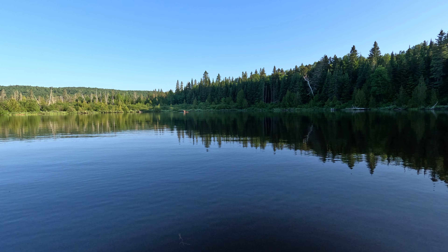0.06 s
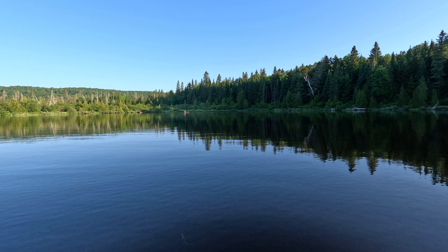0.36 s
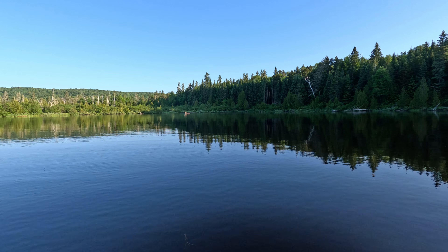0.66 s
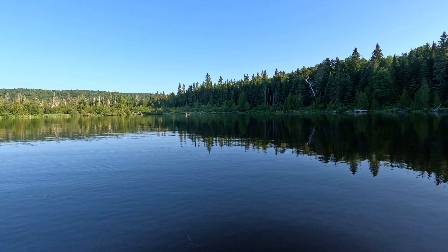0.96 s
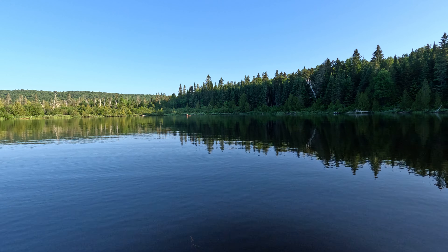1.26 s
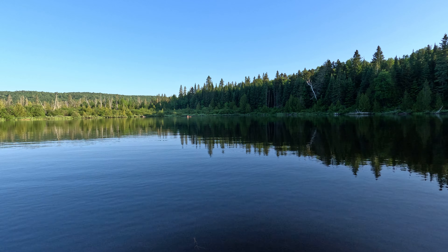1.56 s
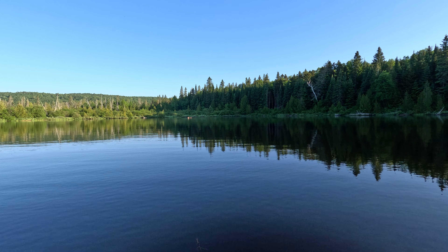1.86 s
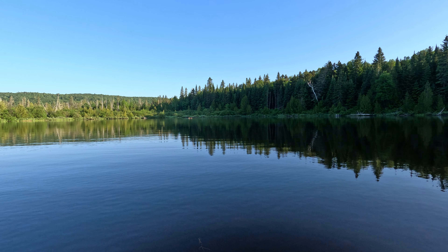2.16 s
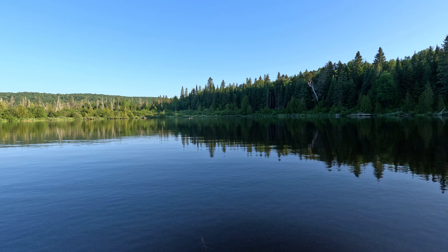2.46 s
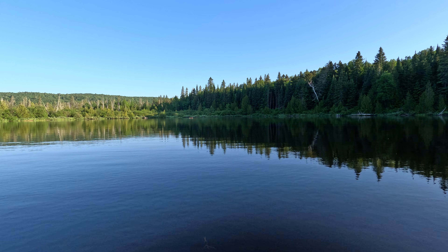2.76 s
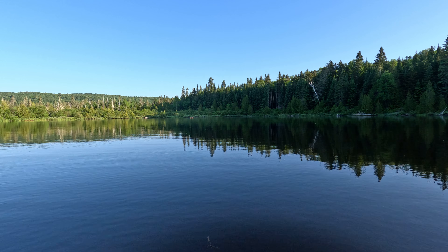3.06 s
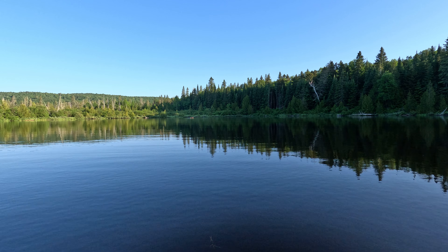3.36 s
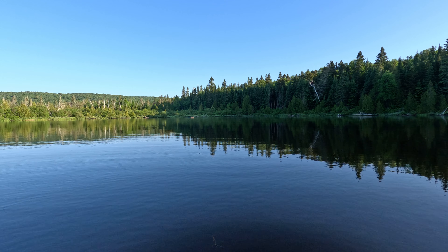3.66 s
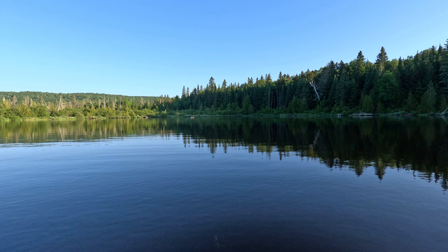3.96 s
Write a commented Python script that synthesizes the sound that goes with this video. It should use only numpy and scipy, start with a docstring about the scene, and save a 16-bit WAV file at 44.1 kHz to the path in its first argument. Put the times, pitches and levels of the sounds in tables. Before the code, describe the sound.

Distant rasping caws repeat and echo in the trees by a quiet lake, over small chirping birds and soft puffs of air on the microphone. Two small water drips come midway, then four short, closer animal clucks.

```python
"""Four seconds at a calm forest lake. From the start, small songbirds whistle and light puffs of air
rumble on the microphone over a faint hush. Soon crow-like birds far off on the left begin their
rasping caws: quick pulses that ring in the throat and echo in the trees. After a second comes a tiny
tick, then water drips twice, each drip a small ringing bubble. Near the end a closer animal clucks
four times, and the shore answers."""
import sys
import numpy as np
from scipy import signal
from scipy.fft import rfft, irfft, next_fast_len
from scipy.io import wavfile
from scipy.ndimage import map_coordinates

SR = 44100
rng = np.random.default_rng(int(sys.argv[2]) if len(sys.argv) > 2 else 0)


def to_wav(s):
    """Save 16-bit WAV."""
    ch = np.atleast_2d(s).T  # columns
    pcm = np.round(np.clip(ch, -1, 1) * 32767)  # PCM
    wavfile.write(sys.argv[1], SR, pcm.astype(np.int16))


N = 176400

# The caws. Each row: start and length in seconds, pitch in Hz, share by which the pitch falls, relative
# level in dB, its change over the call in dB, upper throat resonance in Hz, its relative level in dB,
# roughness from 0 to 1.
CAW_CALLS = [(.38, 0.53, 1235, .085, -61.5, -4, 1600, -15.5, 0.26),
             (0.738, .28, 1487, 0.1, -65.5, 6.5, 1790, -19.5, 0.43),
             (1.197, 0.25, 1289, 0.13, -50, -13, 1713, -11, 0.16),
             (1.391, 0.17, 1373, 0.034, -59.5, -5, 1540, 0, 0.5),
             (1.819, .23, 1296, 0.067, -54, -8.5, 1690, -21, 0.06),
             (1.968, 0.26, 1383, 0.048, -64.5, -2.5, 1633, -11, 0.89),
             (2.209, .19, 1375, 0.0069, -63.5, -6, 1730, -16, 0.9),
             (2.634, .42, 1391, .13, -62, -5.5, 1715, -6, .6),
             (3.376, 0.13, 1277, 0.0091, -60.5, -3.5, 1505, -15.5, 0.65),
             (3.52, 0.29, 1324, .04, -66, -14, 1550, -28, 0.53),
             (3.951, .38, 1110, .021, -59.5, -15, 1450, -6, 0.4)]
# The clucks. Each row: start and length in seconds, top pitch in Hz, relative level in dB.
CLUCK_CALLS = [(2.9392, 0.019, 737.5, -42), (3.1964, .0172, 729, -43), (3.495, .0188, 753, -43.5),
               (3.8522, 0.017, 792, -44)]
# Buzzy notes of the loudest songbird. Each row: start and length in seconds, first, middle and last
# pitch in Hz, relative level in dB, left over right in dB, size of the warble in Hz.
BUZZY_NOTES = [(0, 0.037, 2770, 2727, 2290, -68.5, 11, 170), (0.01, 0.048, 3420, 4700, 4030, -74, 2, 231),
               (0.053, 0.13, 4370, 3987, 3500, -71.5, 7, 353),
               (0.13, 0.12, 3715, 3770, 3790, -73, 10, 59.6), (1.163, 0.12, 5110, 4490, 4570, -79, 3, 253),
               (1.241, 0.1, 2750, 3162, 3907, -65, 0.5, 195),
               (1.266, 0.12, 4230, 4220, 3610, -76.5, 2, 345),
               (1.404, 0.11, 2750, 3894, 4730, -68.5, -0.5, 202),
               (1.49, 0.15, 4370, 4830, 4120, -76.5, 1.5, 379),
               (1.524, 0.053, 3980, 2984, 2755, -66, 0.5, 206),
               (1.674, 0.065, 5470, 4540, 3530, -77.5, 2, 400),
               (1.957, 0.083, 3685, 4750, 3740, -77, 3.5, 247.5),
               (2.106, 0.053, 2950, 3490, 3790, -71, 4, 297),
               (2.351, 0.11, 3950, 2728, 4020, -73.5, 14, 30.4),
               (2.357, 0.084, 5160, 4720, 4270, -79.5, 3, 295),
               (2.495, 0.05, 2915, 3690, 4020, -71.5, 3.5, 240), (2.61, .07, 2920, 3442, 3790, -71, 4, 201),
               (2.743, 0.086, 3270, 4360, 5120, -80, 5, 382)]
# Quick slides of smaller birds, and thin high whistles. Each row: start and length in seconds,
# first, middle and last pitch in Hz, relative level in dB.
SLIDING_NOTES = [(0.371, 0.068, 5600, 4580, 2940, -79.5), (0.558, 0.089, 5000, 3740, 2660, -79.5),
                 (0.76, 0.043, 4970, 3540, 2580, -76), (0.895, 0.026, 4180, 4770, 6000, -78.5),
                 (0.944, 0.032, 4920, 3620, 2840, -77.5), (1.081, 0.033, 5050, 3630, 2540, -77),
                 (1.125, 0.021, 3000, 3440, 3480, -75), (1.73, 0.013, 2500, 3716, 4190, -67.5),
                 (1.829, 0.034, 4100, 3730, 3670, -75), (2.076, 0.033, 5770, 4490, 3600, -77.5),
                 (2.225, 0.014, 3820, 3920, 3570, -73), (2.477, 0.033, 5400, 4310, 3500, -75.5),
                 (2.876, 0.039, 2750, 3080, 3300, -78), (2.892, 0.028, 6740, 5760, 3910, -77),
                 (2.988, 0.042, 4580, 4167, 3700, -77.5), (3.127, 0.041, 3010, 3290, 3230, -83.5),
                 (3.413, 0.047, 2840, 3130, 3520, -86),]
THIN_NOTES = [(0.214, 0.29, 7270, 7020, 7620, -93), (0.58, 0.19, 7660, 7730, 7870, -95),
              (3.041, 0.47, 8000, 7320, 6640, -91.5)]
# The drips. Each row: start and swelling time in seconds, first and last pitch in Hz, level in dB,
# left over right in dB.
DRIP_BUBBLES = [(1.736, 0.021, 1500, 2335, -50, -4), (2.657, 0.0052, 820, 1110, -50.5, 0)]
# Puffs of air. Each row: middle and rough length in seconds, relative levels of the push and of the
# flutter in dB, left over right in dB.
AIR_PUFFS = [(0.078, 0.09, -33, -68, -6), (0.191, 0.074, -38.5, -71, -6), (0.313, 0.083, -42, -73.5, -6.5),
             (0.526, 0.057, -38.5, -61.5, -9), (0.59, 0.074, -36.5, -72, -5), (0.744, 0.032, -47, -60, 8.5),
             (.886, 0.051, -37, -61.5, -6.5), (1.13, 0.069, -44, -89, -5), (1.372, 0.031, -49.5, -63.5, -6),
             (1.466, 0.061, -42, -70, -4.5), (2.13, 0.056, -42.5, -59.5, -5.5),
             (2.191, 0.065, -43, -81, -5), (2.874, .072, -34.5, -55, 11), (2.929, 0.087, -39.5, -55, -0.5),
             (3.097, 0.086, -33.5, -55, -2.5), (3.285, 0.065, -43, -59.5, 3),
             (3.608, 0.066, -36, -56.5, -4.5), (3.673, 0.06, -44, -65.5, -3)]

# Tone curves, which make some frequencies louder than others. Each row: frequency in Hz, gain in dB.
CAW_TONE = [(700, -46), (950, -12), (1100, -2), (1300, -6), (1750, -3.5), (1950, -7.5), (2300, -9.5),
            (3000, -40)]
CLUCK_THROAT_TONE = [(500, -9), (750, -12.5), (1000, -10.5), (1220, -3), (1470, 1), (1800, -13.5),
                     (2200, -21), (2900, -38)]
CLUCK_ECHO_TONE = [(450, -3.5), (700, -8.5), (1300, -5), (2300, -4)]
TICK_TONE = [(3000, -49), (4800, 13), (5800, 8), (7500, -9), (11000, -15), (14000, -40)]
RUMBLE_TONE = [(10, 8.5), (25, -0.5), (36, 4), (50, -20), (70, -22), (110, -41.5), (250, -81.5),
               (600, -120)]
FLUTTER_TONE = [(30, -26.5), (60, 5), (110, -7), (160, -14), (220, -20.5), (400, -37), (900, -70),
                (2000, -120)]
HUSH_TONE = [(85, -31), (135, 3.5), (190, 2.5), (290, -3.5), (400, -6.5), (600, -5), (850, -12), (1280, -5),
             (1600, -14.5), (2200, -14), (3300, -19), (5000, -23.5), (6300, -25), (7500, -27), (8700, -35),
             (10500, -39.5), (11900, -34.5), (13000, -40)]
# How long the trees and the shore echo. Each row: frequency in Hz, seconds to fade by 60 dB.
FOREST_FADE = [(300, 0.26), (1400, 2.58), (4000, 1.29), (9000, 0.47)]
SHORE_FADE = [(300, 0.15), (1400, 0.11), (4000, 0.055), (9000, 0.066)]


def caw(length, hz, fall, fade_db, upper_hz, upper_db, roughness):
    """One caw: quick pulses ring through two throat resonances; the pitch scoops up, then sags."""
    main_harmonic = 19  # the pulses come this many times slower than the pitch
    rise_s, release_s = .08, .06
    lower_half_width_hz, upper_half_width_hz = 78, 129
    t = np.arange(int((length + release_s / 2) * SR)) / SR
    scoop = .07 * np.clip(1 - t / rise_s, 0, 1) ** 2
    sag = fall * np.clip((t - rise_s) / (length - rise_s), 0, None) ** 1.4
    pitch = hz * (1 - scoop - sag + 0.0028 * wobble(18, len(t)))
    pulse_phase = 2 * np.pi * np.cumsum(pitch) / SR / main_harmonic
    opening = amp(upper_db + 10.5 * (t / length - .5))  # the upper resonance grows during the call
    voice = 0
    for k in range(14, 32):
        harmonic_hz = hz * k / main_harmonic
        lower = 1 / (1 + ((harmonic_hz - hz) / lower_half_width_hz) ** 2)
        upper = opening / (1 + ((harmonic_hz - upper_hz) / upper_half_width_hz) ** 2)
        steady = np.exp(2.5j * rng.standard_normal())  # each harmonic starts at a random phase
        rasp = roughness * (wobble(70, len(t)) + 1j * wobble(70, len(t)))
        harmonic = np.real((steady + rasp) * np.exp(1j * k * pulse_phase))
        waver = amp(2 * wobble(18, len(t)))
        voice = voice + (lower + upper + amp(-29)) * waver * harmonic
    return unit(voice) * amp(fade_db * t / length) * gate(t, t[-1], attack=.09, release=release_s)


def crows(right_lag_s=0.00035):
    """Caws come from the left, so they reach the right microphone later; the woods blur them."""
    calls = np.zeros(N)
    for start, length, hz, fall, db, fade_db, upper_hz, upper_db, roughness in CAW_CALLS:
        add(calls, start, amp(db) * caw(length, hz, fall, fade_db, upper_hz, upper_db, roughness))
    calls = coloured(calls, CAW_TONE)
    shore = amp(-3.5) * echoes(calls, SHORE_FADE, side_db=-16)
    early = panned(amp(5.5) * calls + shore, pan_db=14.5)
    forest = amp(-6.5) * panned(echoes(calls, FOREST_FADE, side_db=0), pan_db=3)
    return delayed(early, np.array([[0], [right_lag_s]])) + forest


def clucks(rise_s=0.0051, tail_s=0.022):
    """Very short notes flick up and fall back through a throat resonance, and the shore answers."""
    calls = np.zeros(N)
    for start, length, top_hz, db in CLUCK_CALLS:
        t = np.arange(int((length + tail_s) * SR)) / SR
        arc = np.interp(t, [0, rise_s, length, t[-1]], [0.73, 1, 0.77, 0.59])
        pitch = top_hz * arc * (1 + .018 * wobble(600, len(t)))
        phase = 2 * np.pi * np.cumsum(pitch) / SR
        harmonics = [amp(along(CLUCK_THROAT_TONE, k * pitch)) * np.sin(k * phase) for k in range(1, 5)]
        lowest = harmonics[0] * gate(t, t[-1], rise_s, release=t[-1])  # outlasts the overtones
        overtones = sum(harmonics[1:]) * gate(t, length, rise_s, release=0.0018)
        add(calls, start, amp(db) * (lowest + overtones))
    shore = echoes(coloured(calls, CLUCK_ECHO_TONE), SHORE_FADE, side_db=-11)
    forest = amp(-18.5) * echoes(calls, FOREST_FADE, side_db=-5)
    return panned(calls + amp(-5.5) * delayed(shore, seconds=.009), pan_db=7) + forest


def whistle(length, first, middle, last, buzz_hz, shimmer_db=2.5):
    """One bird note follows an arc of pitch, with a quick random warble."""
    t = np.arange(int(length * SR)) / SR
    arc = np.polyval(np.polyfit([0, .5, 1], [first, middle, last], 2), t / length)
    pitch = arc + buzz_hz * wobble(700, len(t))
    tone = np.sin(2 * np.pi * np.cumsum(pitch) / SR)
    shimmer = amp(shimmer_db * wobble(110, len(t)))
    return unit(tone * shimmer) * gate(t, length, length / 4, length / 4)


def songbirds():
    """Buzzy notes and quick slides echo off the shore and trees; thin whistles sound above them."""
    song, thin = np.zeros((2, N)), np.zeros(N)
    for start, length, *pitches, db, pan_db, buzz_hz in BUZZY_NOTES:
        add(song, start, panned(amp(db) * whistle(length, *pitches, buzz_hz), pan_db))
    for start, length, *pitches, db in SLIDING_NOTES:
        add(song, start, panned(amp(db) * whistle(length, *pitches, buzz_hz=101), pan_db=5.5))
    for start, length, *pitches, db in THIN_NOTES:
        add(thin, start, amp(db) * whistle(length, *pitches, buzz_hz=80, shimmer_db=5))
    shore = amp(-2.5) * echoes(song, SHORE_FADE, side_db=-5.5)
    forest = amp(-5.5) * echoes(song, FOREST_FADE, side_db=-5.5)
    return amp(-4) * song + shore + forest + panned(thin, pan_db=5)


def drips(damping=2.6):
    """Small bubbles ring louder as their pitch rises, then die away at once."""
    bubbles = np.zeros((2, N))
    for start, rise_s, first_hz, last_hz, db, pan_db in DRIP_BUBBLES:
        age = np.arange(int(4 * rise_s * SR)) / SR / rise_s  # 1 at the loudest moment
        pitch = last_hz + (first_hz - last_hz) * np.clip(1 - age, 0, 1) ** 2
        tone = np.sin(2 * np.pi * np.cumsum(pitch) / SR)
        swell = np.minimum(age, 1) ** 1.05 * np.exp(-damping * np.maximum(age - 1, 0))
        add(bubbles, start, panned(amp(db) * tone * swell, pan_db))
    return bubbles + amp(-17) * echoes(bubbles, SHORE_FADE, side_db=-5)


def tick(start_s=1.039, decay_s=.0016):
    """One tiny, dry tick close by: a burst of bright noise."""
    t = np.arange(N) / SR - start_s
    return amp(-63.5) * noise(TICK_TONE, side_db=-12) * (t > 0) * np.exp(-np.abs(t) / decay_s)


def air_puffs():
    """Each puff pushes and pulls on the microphone and flutters; an uneven rumble goes on beneath."""
    t = np.arange(N) / SR
    pushes, flutter_level = np.zeros(N), amp(-89)
    for middle, length, push_db, flutter_db, pan_db in AIR_PUFFS:
        age = (t - middle) / length
        offset = rng.random() + 0.11 * rng.random((2, 1))  # left and right are a little out of step
        push = np.sin(2 * np.pi * (1.72 * age + offset)) * np.exp(-(2 * age) ** 2)
        pushes = pushes + panned(amp(push_db) * push, pan_db)
        flutter_level = flutter_level + panned(amp(flutter_db) * np.exp(-(1.17 * age) ** 2), pan_db)
    rumble = amp(-53 + 3 * wobble(6.87)) * noise(RUMBLE_TONE, side_db=-4.5)
    return pushes + panned(rumble, pan_db=-3) + flutter_level * noise(FLUTTER_TONE, side_db=-4)


def forest_hush():
    """A faint, wide noise whose level drifts slowly."""
    return panned(amp(-73.5 + 0.96 * wobble(1.2)) * noise(HUSH_TONE, side_db=-3.5), pan_db=-1)


def echoes(x, fade_times, side_db):
    """The surroundings answer with a wash of echoes; each frequency fades at its own speed."""
    hz, t, spectrum = signal.stft(rng.standard_normal((2, SR)), SR, nperseg=256)
    fade = amp(-60 * t / along(fade_times, hz)[:, None])
    mid, side = signal.istft(spectrum * fade, SR, nperseg=256)[1]
    tail = (mid + side * amp(side_db) * np.array([[1], [-1]])) / np.linalg.norm(mid)
    return signal.fftconvolve(np.atleast_2d(x), tail, axes=1)[:, :N]


def noise(tone, side_db):
    """Stereo noise shaped by a tone curve; a higher side_db makes it wider."""
    mid, side = coloured(rng.standard_normal((2, N)), tone)
    return unit(mid) + unit(side) * amp(side_db) * np.array([[1], [-1]])


def amp(db):
    """Turn dB into a number to multiply by."""
    return 10 ** (np.asarray(db) / 20)


def unit(x):
    """Scale x to an average (rms) level of 1."""
    return x / np.sqrt(np.mean(x ** 2) + 1e-20)


def along(points, hz):
    """Read a curve at hz, on a log frequency scale."""
    frequencies, values = np.transpose(points)
    return np.interp(np.log(hz + 1), np.log(frequencies + 1), values)


def wobble(rate, size=N):
    """A smooth curve through `rate` random values a second."""
    return map_coordinates(rng.standard_normal(4096), [np.arange(size) * rate / SR], mode="wrap")


def filtered(x, response):
    """Multiply each frequency in x by response(hz)."""
    size = next_fast_len(N + SR // 2)
    return irfft(rfft(x, size) * response(np.fft.rfftfreq(size, 1 / SR)), size)[..., :N]


def coloured(x, tone):
    """Shape x with a tone curve."""
    return filtered(x, lambda hz: amp(along(tone, hz)))


def delayed(x, seconds):
    """Make x arrive later."""
    return filtered(x, lambda hz: np.exp(-2j * np.pi * hz * seconds))


def panned(x, pan_db):
    """Make the left side louder than the right by pan_db."""
    gains = amp([[pan_db / 2], [-pan_db / 2]])
    return x * gains / gains.mean()


def add(out, start_s, x):
    """Mix x into out from start_s on."""
    i = max(0, round(start_s * SR))
    out[..., i:i + x.shape[-1]] += x[..., :max(0, N - i)]


def gate(t, length, attack, release):
    """Fade in over `attack` seconds and out over the last `release` seconds."""
    fade_in = np.sin(np.pi / 2 * np.clip(t / attack, 0, 1))
    fade_out = np.sin(np.pi / 2 * np.clip((length - t) / release, 0, 1))
    return fade_in * fade_out


def scene():
    """All the sounds of the lake together."""
    return crows() + clucks() + songbirds() + drips() + tick() + air_puffs() + forest_hush()


def record(dry):
    """Cut away everything above 12400 Hz."""
    return filtered(dry, lambda hz: hz < 12400)


dry = scene()
out = record(dry)
to_wav(out)
```